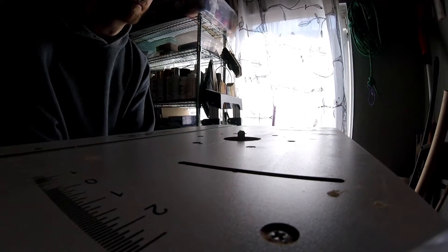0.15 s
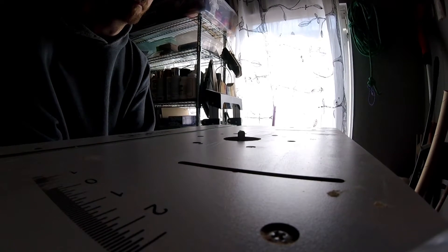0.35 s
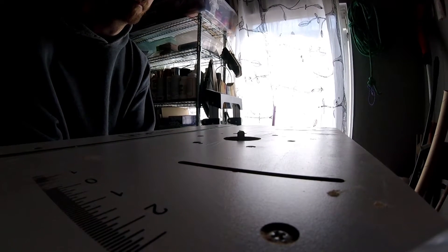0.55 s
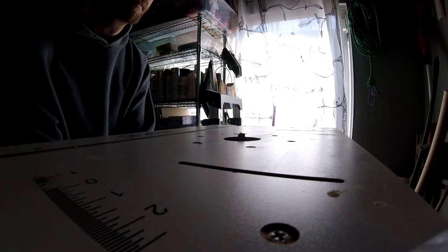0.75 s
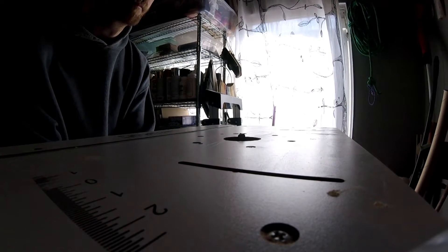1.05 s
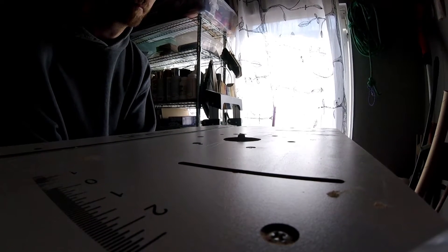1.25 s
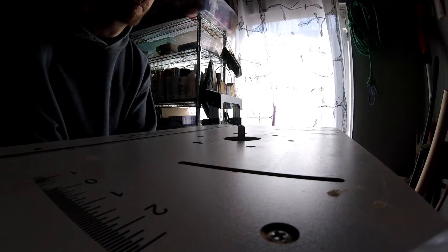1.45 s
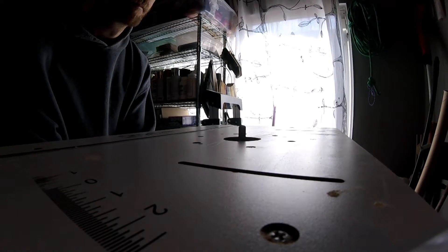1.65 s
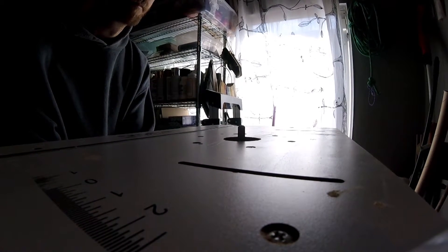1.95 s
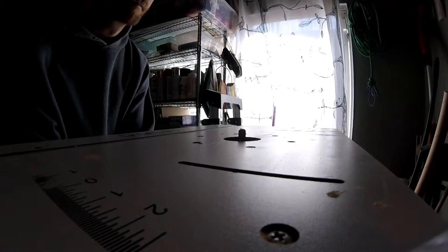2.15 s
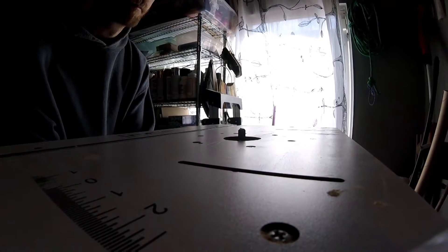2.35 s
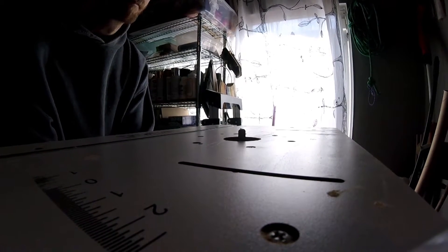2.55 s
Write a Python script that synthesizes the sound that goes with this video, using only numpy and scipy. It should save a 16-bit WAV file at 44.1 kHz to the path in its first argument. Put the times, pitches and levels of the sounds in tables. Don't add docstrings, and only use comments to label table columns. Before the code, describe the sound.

Sharp metallic catch snaps and dull knocks on a workshop router table as its motor is shifted

```python
import sys
import numpy as np
from scipy import signal
from scipy.io import wavfile

SR = 44100
rng = np.random.default_rng(int(sys.argv[2]) if len(sys.argv) > 2 else 0)


def gain_from_decibels(decibels):
    exponent = np.asarray(decibels, float) / 20
    return 10 ** exponent


def transcribe(u):
    v = np.clip(np.atleast_2d(u).T, -1, 1)
    q = np.round(v * 32767).astype(np.int16)
    wavfile.write(sys.argv[1], SR, q)


N = 119070


def rms_one(x):
    return x / np.sqrt(np.mean(x ** 2) + 1e-20)


def at_hz(points, hz):
    points_hz, values = np.transpose(points)
    return np.interp(np.log(hz), np.log(points_hz), values)


def drift(rate_hz):
    pole = np.exp(-80 * np.pi * rate_hz / SR)
    white = rng.standard_normal(N // 40 + 2002)
    slow = signal.lfilter([1], [1, -2 * pole, pole ** 2], white)[2000:]
    return np.interp(np.arange(N) / 40, np.arange(len(slow)), rms_one(slow))


def ring(force, hz, t60):
    pole, turn = gain_from_decibels(-60 / (t60 * SR)), 2 * np.pi * hz / SR
    return signal.lfilter([0, np.sin(turn)], [1, -2 * pole * np.cos(turn), pole ** 2], force + 1e-18)


def body(force, modes):
    out = 0
    for k, (hz, db, t60) in enumerate(modes):
        out = out + (-1) ** k * gain_from_decibels(db) * ring(force, hz, t60)
    return out


def grains(per_s, spread_db, size):
    hit = rng.random(size) < per_s / SR
    strength = gain_from_decibels(spread_db * np.minimum(rng.exponential(1, size), 4))
    return hit * strength * rng.choice([-1, 1], size)


def bands():
    edges = 45 * 2 ** np.arange(0, 8.6, 0.5)
    return [(np.sqrt(low * high), signal.butter(2, [low, high], "band", fs=SR, output="sos"))
            for low, high in zip(edges, edges[1:])]


# time in seconds, level in dB, pitch in Hz.
STAND_SWAY = [(0.0, -44, 39.9), (0.3, -47, 39), (0.41, -37.5, 38.8), (0.79, -44, 39), (0.91, -45, 37.3),
              (1.05, -39, 36.3), (1.22, -35, 36.6), (1.31, -46, 39.7), (1.38, -29, 38.95),
              (1.44, -66, 41.6), (1.49, -34, 43.4), (1.86, -51, 36.02), (1.89, -32, 35.63),
              (2.08, -36.5, 34.8), (2.22, -24, 36.3), (2.4, -41.5, 35.7), (2.47, -37.5, 34.9),
              (2.7, -50, 40.4)]


def sway():
    s, db, hz = np.transpose(STAND_SWAY)
    t = np.arange(N) / SR
    pitch = np.interp(t, s, hz) * (1 + 0.0356 * drift(14.6))
    level_db = np.interp(t, s, db) + 2.0 * drift(2.8)
    return np.sqrt(2) * gain_from_decibels(level_db) * np.sin(2 * np.pi * np.cumsum(pitch) / SR)


# frequency in Hz, level in dB.
HISS_COLOUR = [(29, -30), (50, -3.5), (186, -9), (678, -15), (1240, -17.5), (2300, -30), (5800, -37),
               (8780, -54.5), (12400, -41.5), (16100, -102), (22000, -120)]


def air():
    level_db, patchy_db = -40, 2
    white = rng.standard_normal((2, N))
    out = 0
    for k, (hz, sos) in enumerate(bands()):
        gain = gain_from_decibels(at_hz(HISS_COLOUR, hz) + patchy_db * drift(16.3))
        out = out + gain * signal.sosfilt(sos, white[k % 2])
    return gain_from_decibels(level_db) * rms_one(out)


# time in seconds, peak level in dB, pitch in Hz.
SMALL_TICKS = [(0.075, -52, 5090), (1.073, -49.5, 5100), (1.2537, -48.5, 4780), (1.391, -45, 4750),
               (1.476, -44, 4540), (1.5472, -49, 4600), (1.6054, -50, 4740), (1.6574, -49, 4630),
               (1.796, -48.5, 4860), (1.8282, -44, 3840), (1.8751, -50, 4330), (1.929, -45.5, 4840),
               (2.2917, -56, 4076), (2.317, -52, 4560), (2.389, -48, 4600), (2.4698, -47, 4900),
               (2.5482, -53.5, 5180)]


def ticks():
    gain_db, t60 = 14, 0.007
    out, click = np.zeros(N), np.eye(1, 1500)[0]
    for s, db, hz in SMALL_TICKS:
        i = int(s * SR)
        modes = [(0.96 * hz, -3, t60), (1.007 * hz, 0, t60), (1.16 * hz, -3, t60)]
        out[i:i + 1500] += 0.5 * gain_from_decibels(db + gain_db) * body(click, modes)
    return out


# frequency in Hz, level in dB, decay t60 in seconds.
THUD_MODES = [(64.4, -3.5, 0.26), (87, -5, 0.16), (116.7, 1, 0.14), (159.4, -2.5, 0.117)]
PANEL_MODES = [(227, -4.5, 0.049), (258, -5.5, 0.064), (326.5, 3, 0.085), (356, -3, 0.096),
               (427, -2, 0.085), (471, 3.5, 0.0084)]
EDGE_MODES = [(580, 1.5, 0.02), (710, 8.5, 0.011), (950, -2, 0.044)]
PLATE_MODES = [(1206, 0.44, 0.032), (1700, -1.8, 0.03)]
BRIGHT_MODES = [(2230, -3, 0.017), (2870, -5, 0.012), (3340, -8, 0.011), (4250, -10, 0.01)]
# time in seconds, then thud, panel, edge, plate and bright levels in dB.
SOFT_KNOCKS = [(0.199, -32, -33, -46, -43, -62), (0.359, -31.5, -25, -33.5, -33.5, -44.5),
               (.512, -32.5, -29, -32.5, -33, -39.5), (.637, -29.5, -24, -31, -36, -45.5),
               (1, -30, -33, -53, -46, -62), (1.61, -34, -27.5, -48, -51, -62),
               (1.841, -33, -34.5, -56, -44, -57), (1.8635, -32.5, -26, -33, -31, -47),
               (2.073, -29.5, -27, -44, -49, -52), (2.397, -30.5, -31.5, -56, -56, -60),
               (1.475, -33, -30, -35.5, -37, -54), (2.1325, -45, -30, -26, -45, -52)]
# time in seconds, thud level in dB, panel level in dB.
MOTOR_JOLTS = [(.826, -39, -31.5), (0.865, -50, -23.5), (0.909, -32, -30.5), (1.329, -26, -25),
               (1.337, -37, -26.5), (1.367, -34, -40), (1.383, -43, -36), (1.438, -38, -29),
               (1.646, -41, -36.5), (1.473, -30.5, -26.5), (1.495, -32.5, -26.5), (2.134, -41, -14.5),
               (2.149, -27, -28), (2.172, -26, -25)]


def knocks():
    size, rattle_size = 12000, 2000
    strike_spread_db, rattle_fade_s, push_cycles = 2.0, 0.005, 0.5
    # modes, gain in dB, share of rattle
    groups = [(THUD_MODES, 4.5, 0.3), (PANEL_MODES, 1.5, 0.3), (EDGE_MODES, 6, 0.3),
              (PLATE_MODES, 6, 0.25), (BRIGHT_MODES, 6, 0.3)]
    fade = np.exp(-np.arange(rattle_size) / SR / rattle_fade_s)
    out = np.zeros(N)
    for s, *levels in SOFT_KNOCKS + MOTOR_JOLTS:
        i = int(s * SR)
        for (modes, gain_db, rattle), db in zip(groups, levels):
            force = np.zeros(size)
            force[:rattle_size] = grains(1500, 0.61, rattle_size) * rattle * fade
            force[0] = 1
            push = np.hanning(3 + int(push_cycles * SR / modes[-1][0]))
            force = np.convolve(force, push)[:size]
            struck = [(hz, d + strike_spread_db * rng.standard_normal(), t60) for hz, d, t60 in modes]
            tone = body(force, struck)
            out[i:i + size] += (gain_from_decibels(db + gain_db) * tone / np.abs(tone).max())[:N - i]
    return out


# start in seconds, length in seconds, then thud, panel and scrape levels in dB.
MOTOR_SLIDES = [
    (0.746, 0.22, -27, -35, -46),
    (1.001, 0.13, -39, -56, -50),
    (1.328, 0.081, -28, -35, -40),
    (1.418, 0.062, -34.5, -37, -43),
    (1.452, 0.063, -30, -34, -40.5),
    (1.79, 0.13, -63, -40.5, -48.5),
    (2.071, 0.17, -33.5, -42.5, -41),
]


def slides():
    rub_db, scrape_top_hz = 2.5, 5340
    t, slips = np.arange(N) / SR, grains(2200, 5, N)
    strokes = np.zeros((3, N))
    for s, length, *db in MOTOR_SLIDES:
        swell = np.sin(np.pi * np.clip((t - s) / length, 0, 1)) ** 1.6
        strokes += gain_from_decibels(db)[:, None] * swell
    strokes = strokes * gain_from_decibels(1.7 * drift(47))

    def shaken(stroke, modes):
        return body(stroke * slips, modes) / np.std(body(slips, modes))

    low = shaken(strokes[0], THUD_MODES) + shaken(strokes[1], PANEL_MODES)
    low = low + gain_from_decibels(rub_db) * shaken(strokes[2], EDGE_MODES + PLATE_MODES[:1])
    hiss = signal.lfilter([1], [1, -0.93], rms_one(slips) + 1.8 * rng.standard_normal(N))
    hiss = signal.sosfilt(signal.butter(2, 500, "high", fs=SR, output="sos"), hiss)
    hiss = signal.sosfilt(signal.butter(4, scrape_top_hz, fs=SR, output="sos"), hiss)
    return low + strokes[2] * rms_one(hiss)


# time in seconds, peak level in dB, contact length in seconds,
# lead-in level in dB, delay of each resonance in cycles.
CATCH_SNAPS = [
    (0.864, -8, 0.0029, -8, 2.54),
    (1.3118, -12, 0.003, -16, 2.2),
    (1.3273, -16, 0.0028, -27, 3.18),
    (2.1305, -1.5, 0.0026, -11, 2.2),
    (0.87, -20, 0.003, -26, 0.64),
    (1.322, -24.5, 0.0017, -30, 0.64),
    (2.141, -15, .002, -30, .6),
    (2.148, -22.5, 0.0027, -32, 0.8),
]
# frequency in Hz, width in Hz, level in dB.
FIRST_CATCH = [(715, 200, 0.5), (1165, 190, 0), (1570, 130, -13), (1910, 780, -6), (2680, 500, 0),
               (3617, 590, -1.5), (4750, 300, -14), (5830, 440, -19), (8300, 370, -21.5),
               (10100, 790, -32.5)]
SECOND_CATCH = [(1170, 230, -2), (1703, 120, 5.5), (2380, 240, -10.5), (3190, 230, -5.5), (4840, 310, -5.5),
                (5570, 320, -8.5), (5920, 340, -19.5), (7800, 650, -26), (9700, 900, -33.5)]
REBOUND_CATCH = [(1157, 400, 2.5), (1580, 280, 0), (2420, 550, -2.5), (3750, 350, -6.5), (4310, 440, -9),
                 (4750, 300, -9), (5560, 400, -13), (7900, 600, -27)]
LOCK_CATCH = [(710, 430, -5.5), (1135, 510, 2.5), (1504, 370, -8.5), (1684, 280, 6), (2095, 350, -2),
              (2880, 400, 6.5), (3320, 890, -6.5), (4600, 440, -6.5), (4860, 420, 4), (5530, 450, -16),
              (7400, 770, -44), (9130, 800, -22.5), (10600, 710, -36)]


def snaps(spread, chatter):
    size, lead_s = 4000, 0.004
    t = np.arange(size) / SR - lead_s
    top = np.vstack([signal.butter(4, hz, fs=SR, output="sos") for hz in (9500, 11000)])
    catches = [FIRST_CATCH, SECOND_CATCH, REBOUND_CATCH, LOCK_CATCH,
               FIRST_CATCH, SECOND_CATCH, LOCK_CATCH, LOCK_CATCH]
    out = np.zeros(N)
    for (s, db, length, lead_db, lag), peaks in zip(CATCH_SNAPS, catches):
        lead_in = gain_from_decibels(lead_db) * np.clip(1 + t / lead_s, 0, 1)
        shape = np.where(t < 0, lead_in, np.exp(-(t / length) ** 2))
        tone = 0
        for hz, width, mode_db in peaks:
            force = chatter * shape * grains(6200, 1.0, size)
            force[np.searchsorted(t, lag / hz)] += 1
            sound = ring(force, hz, 3.18 / (spread * width))
            sound = signal.sosfilt(signal.butter(2, 1.3 * hz, fs=SR, output="sos"), sound)
            tone = tone + gain_from_decibels(mode_db) * np.sqrt(width) * rms_one(sound)
        tone = signal.sosfilt(top, tone)
        i = int((s - lead_s) * SR)
        out[i:i + size] += gain_from_decibels(db) * tone / np.abs(tone).max()
    return out


# frequency in Hz, decay t60 in seconds.
SHOP_DECAY = [(500, 0.42), (2000, 0.34), (5000, 0.28), (10000, 0.4)]


def shop(x):
    level_db, early_db, early_s = -5, 24, 0.0091
    t = np.arange(SR // 2) / SR
    white = rng.standard_normal((2, len(t)))
    tail = 0
    for k, (hz, sos) in enumerate(bands()):
        tail = tail + signal.sosfilt(sos, white[k % 2]) * gain_from_decibels(-60 * t / at_hz(SHOP_DECAY, hz))
    tail = tail * np.clip(t / 0.012, 0, 1) * gain_from_decibels(early_db * np.exp(-t / early_s))
    return gain_from_decibels(level_db) * signal.fftconvolve(x, tail / np.sqrt(np.sum(tail ** 2)))[:N]


def scene():
    direct = snaps(spread=0.8, chatter=0.36)
    reflected = shop(snaps(spread=6.9, chatter=0.12))
    return (sway() + air() + ticks() + knocks() + slides() + direct + reflected)[None]


# frequency in Hz, share of patches lost.
TREBLE_LOSS = [(7000, 0), (9000, .14), (11000, .3), (12500, .4)]


def flicker(x):
    kept_db = 8
    hz, t, z = signal.stft(x, SR, nperseg=1024)
    chance = np.kron(rng.random((len(hz) // 4 + 1, len(t) // 3 + 1)), np.ones((4, 3)))
    chance = chance[:len(hz), :len(t)]
    size = np.abs(z[0])
    faint = size < gain_from_decibels(kept_db) * np.median(size, axis=1, keepdims=True)
    lost = faint & (chance < at_hz(TREBLE_LOSS, hz + 1)[:, None])
    return signal.istft(z * ~lost, SR, nperseg=1024)[1][:, :N]


# hit time in seconds, top just before in Hz,
# top at the hit in Hz, recovery in seconds.
DULLED_HITS = [
    (.359, 9500, 12600, .02),
    (.525, 7000, 12600, .02),
    (.652, 7000, 12600, .02),
    (.864, 6500, 11000, .09),
    (1.312, 7000, 10700, .55),
    (2.139, 9000, 10000, .002),
    (2.156, 11300, 11400, .1),
]


def starve(x):
    warning_s, full_hz, waver_hz = 0.016, 12700, 150
    hz, t, z = signal.stft(x, SR, nperseg=256)
    top = full_hz - waver_hz * np.abs(np.interp(t * SR, np.arange(N), drift(15)))
    for s, before_hz, after_hz, recovery in DULLED_HITS:
        edge = np.interp(t, [s - warning_s, s, s + recovery], [before_hz, after_hz, full_hz])
        top = np.where(t >= s - warning_s, np.minimum(top, edge), top)
    return signal.istft(z * (hz[:, None] < top), SR, nperseg=256)[1][:, :N]


def top_cut(x):
    return signal.sosfilt(signal.butter(12, 12700, fs=SR, output="sos"), x)


def record(dry):
    cut = signal.sosfilt(signal.cheby2(12, 70, 13500, fs=SR, output="sos"), dry)
    mix = starve(flicker(cut))
    return top_cut(mix)


dry = scene()
out = record(dry)
transcribe(out)
```